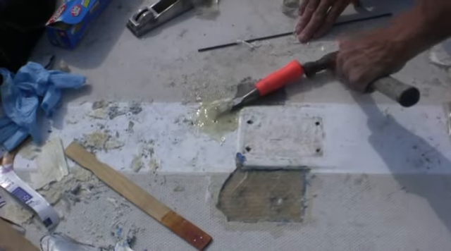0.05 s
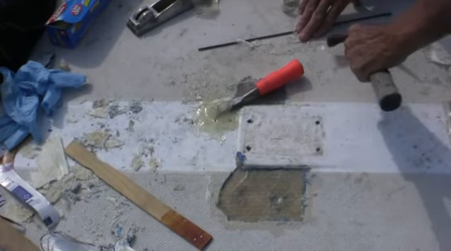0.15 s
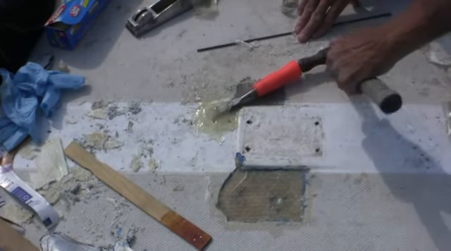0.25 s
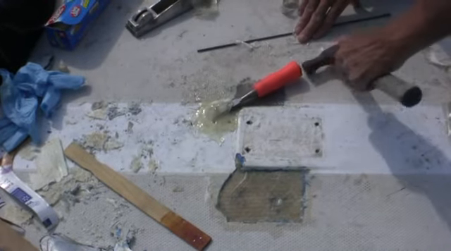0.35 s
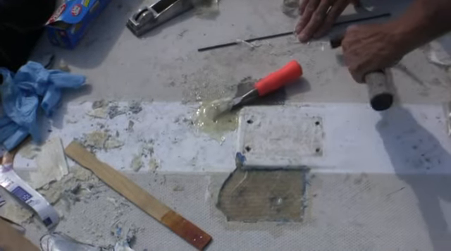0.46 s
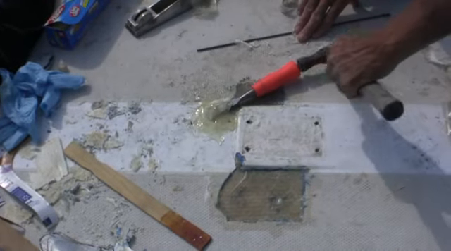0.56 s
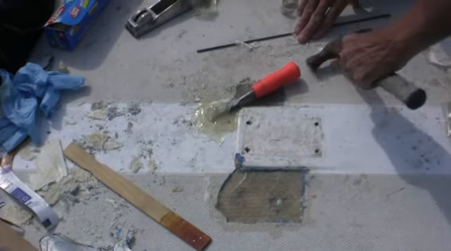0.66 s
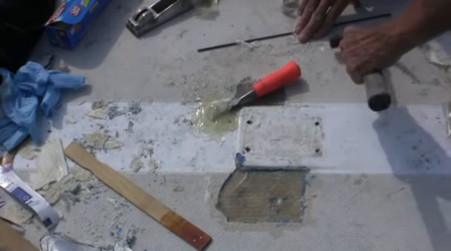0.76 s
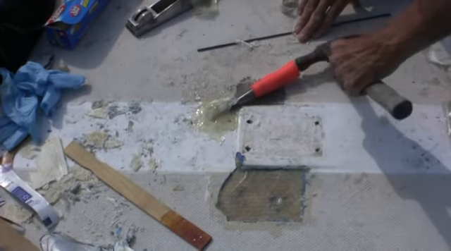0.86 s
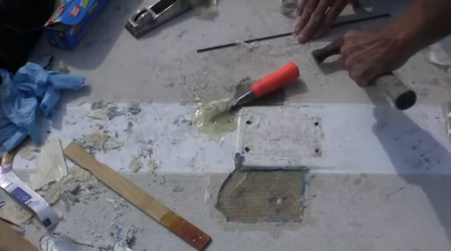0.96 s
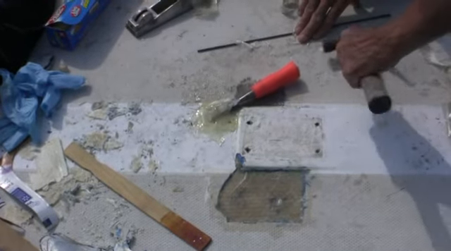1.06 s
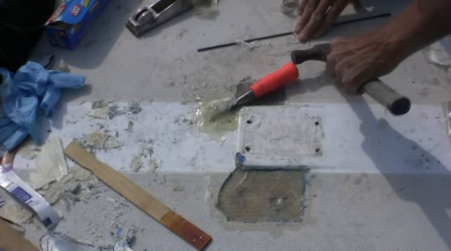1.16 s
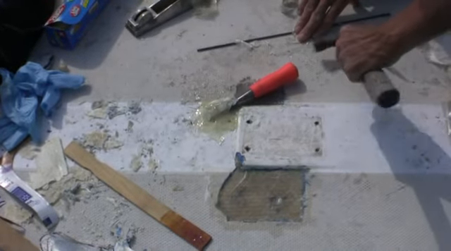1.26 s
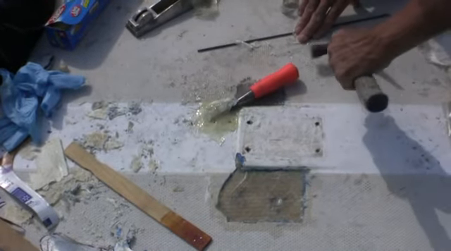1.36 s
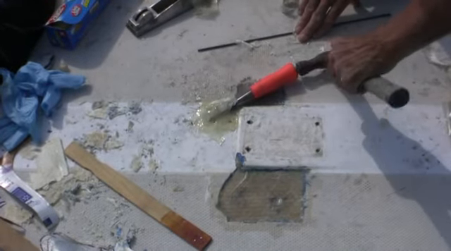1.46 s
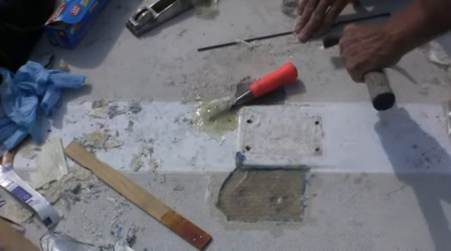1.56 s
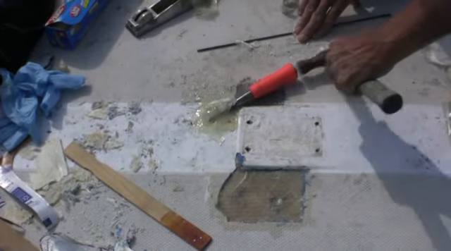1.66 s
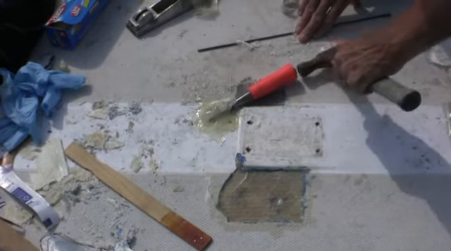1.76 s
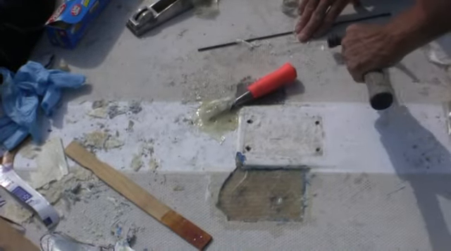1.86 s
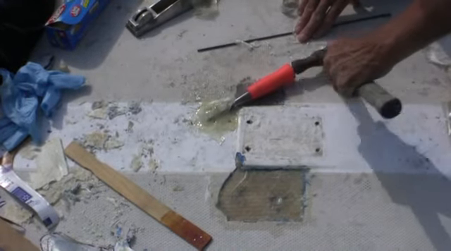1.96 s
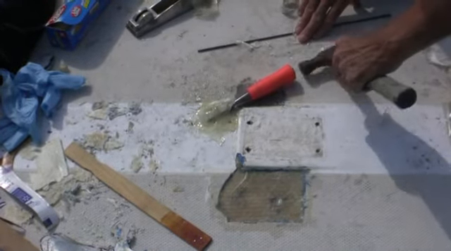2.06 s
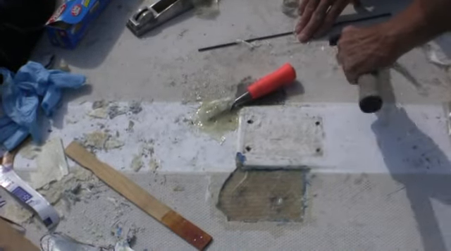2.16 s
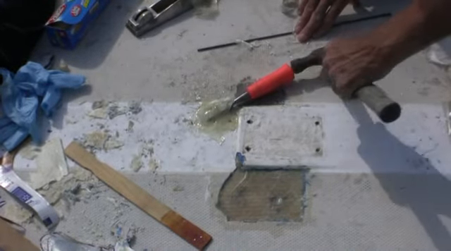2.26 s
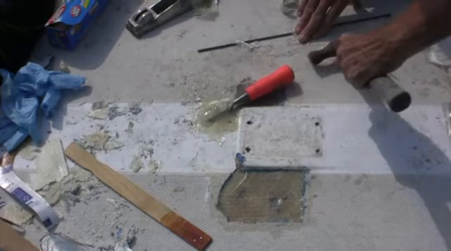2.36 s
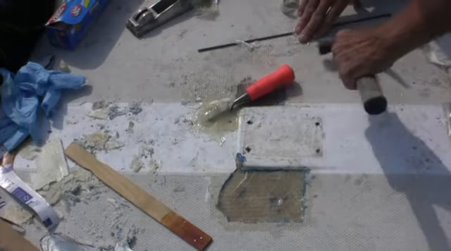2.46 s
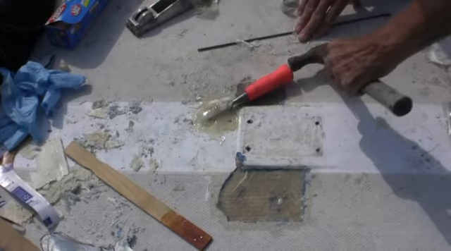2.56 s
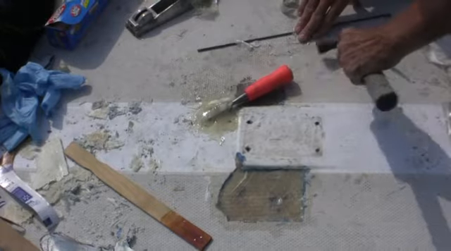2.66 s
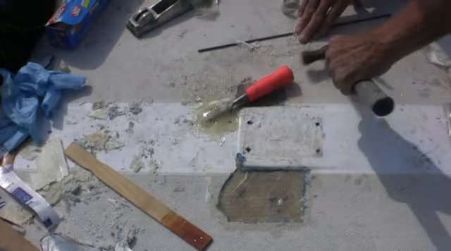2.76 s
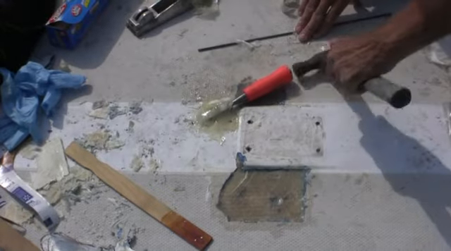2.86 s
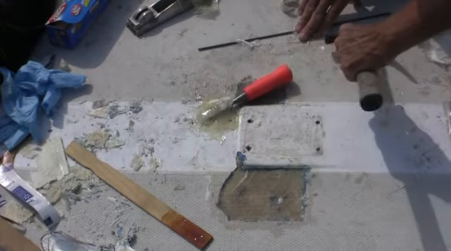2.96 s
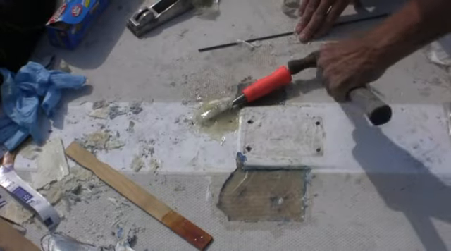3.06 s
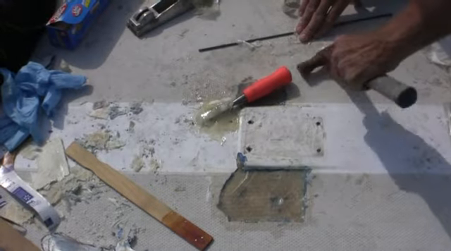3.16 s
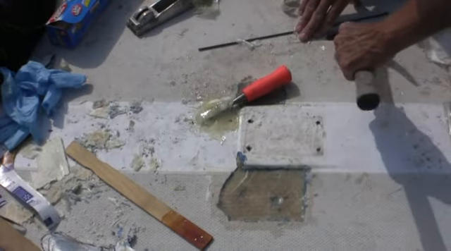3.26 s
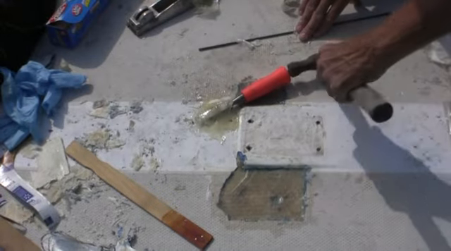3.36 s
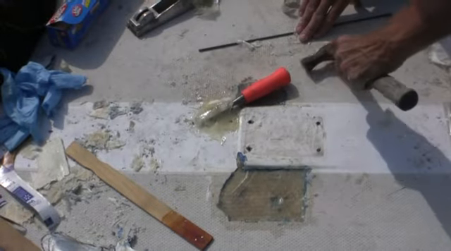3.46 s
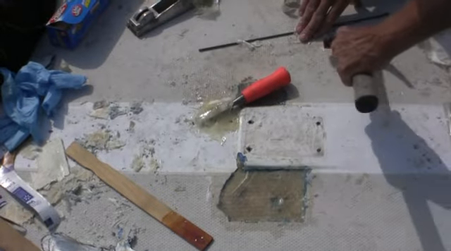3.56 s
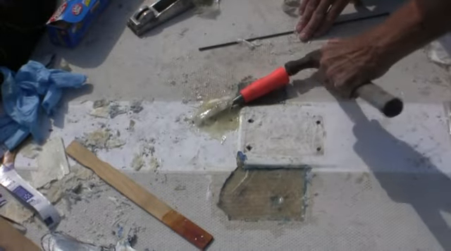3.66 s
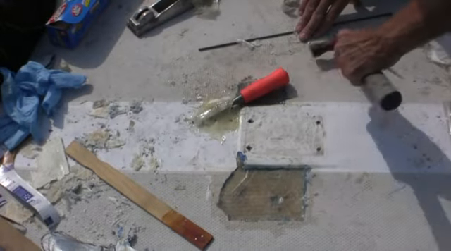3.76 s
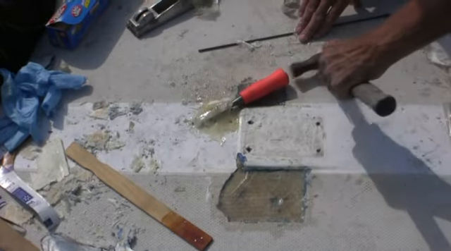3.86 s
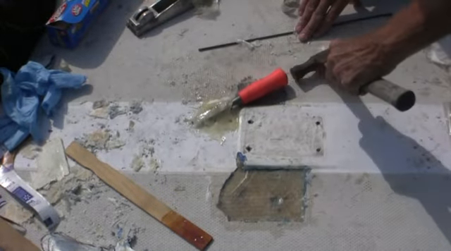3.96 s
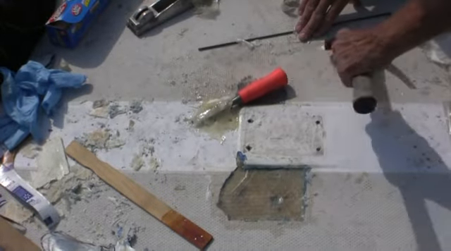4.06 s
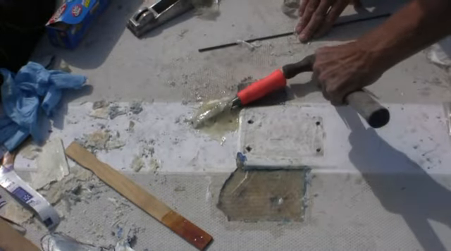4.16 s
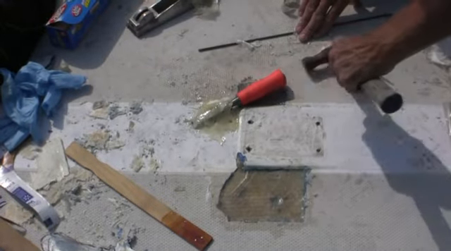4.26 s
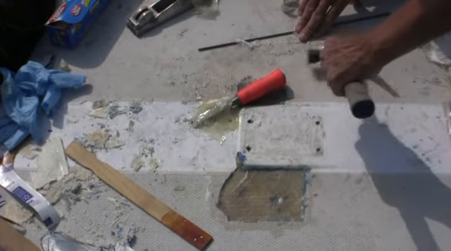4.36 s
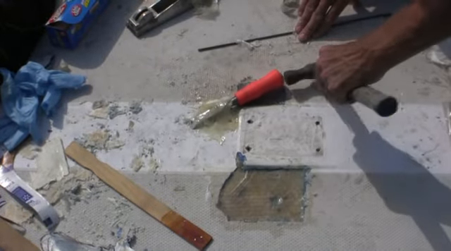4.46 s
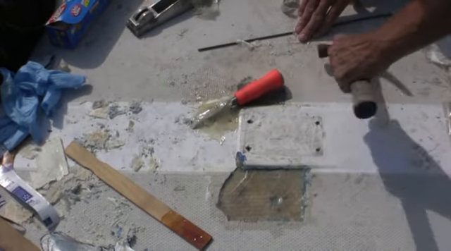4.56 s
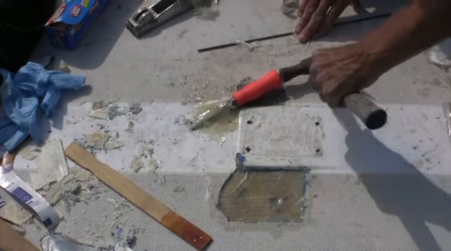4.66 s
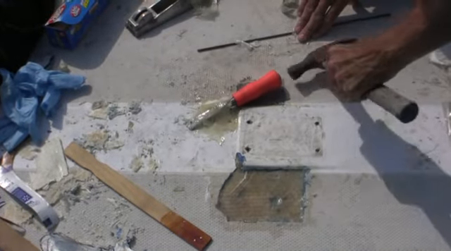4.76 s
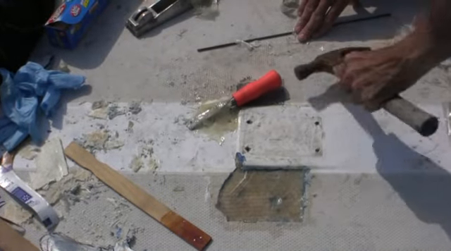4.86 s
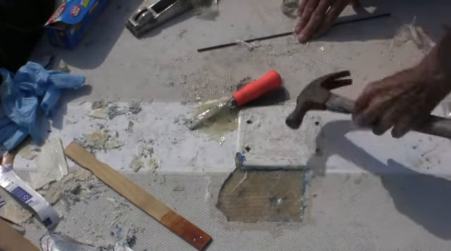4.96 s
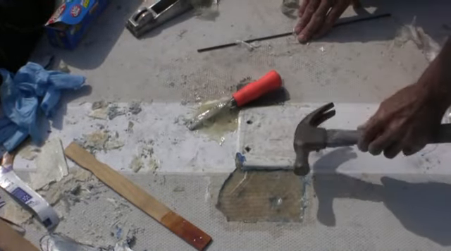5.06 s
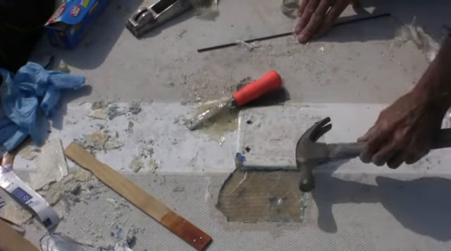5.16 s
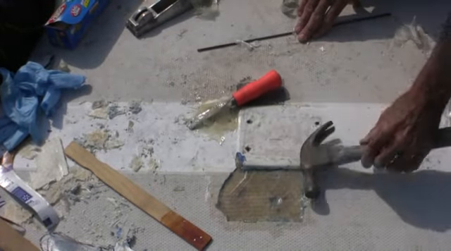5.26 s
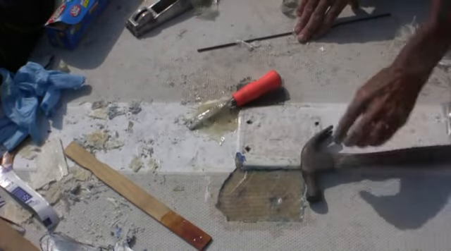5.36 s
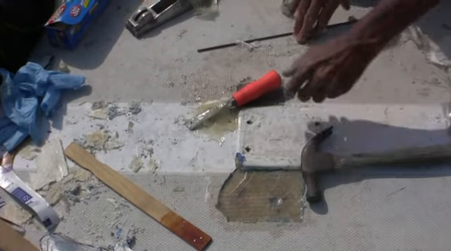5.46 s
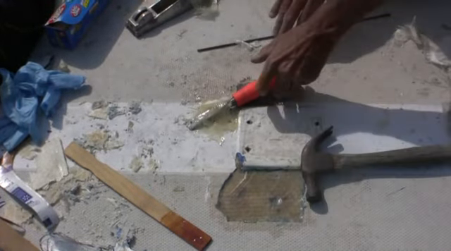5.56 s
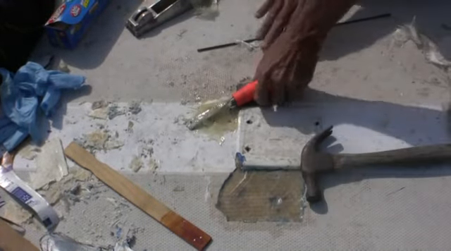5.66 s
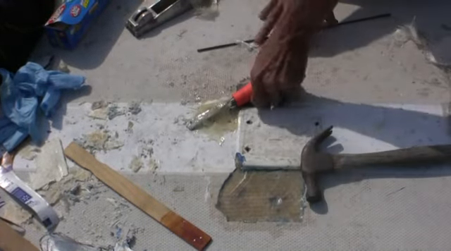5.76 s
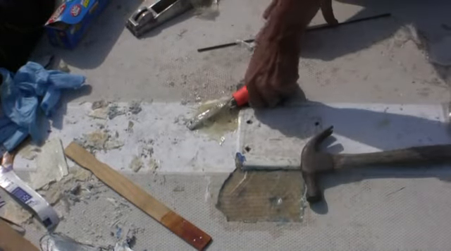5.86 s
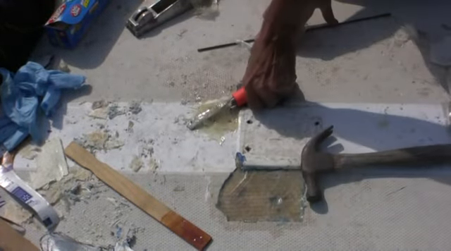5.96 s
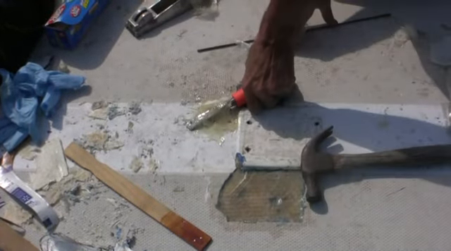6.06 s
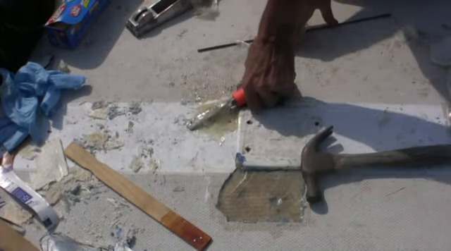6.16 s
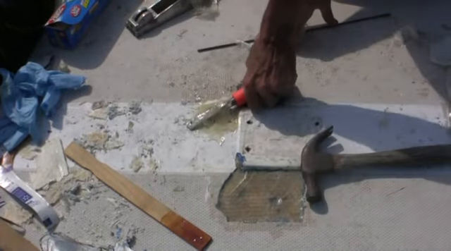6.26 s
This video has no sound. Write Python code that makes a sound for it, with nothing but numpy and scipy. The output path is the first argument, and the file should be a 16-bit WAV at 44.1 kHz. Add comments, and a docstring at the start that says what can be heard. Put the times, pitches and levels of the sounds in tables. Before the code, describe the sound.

Close outdoor stereo: a steel hammer taps a chisel's plastic handle about three and a half times a second, each blow a dry, cracking snap so loud its peak distorts, with brief hollow deck response, faint steel ring and a short slap of nearby echoes. After eighteen even taps, the hammer is dropped, thumping and clattering in quick bounces. Only tiny handling ticks and a soft hush remain.

```python
"""Sharp, evenly spaced taps, then a clatter: a steel hammer taps a chisel's plastic handle and is dropped flat.
Contact: rough noise of a few ms through the chisel's resonances; its peaks overload the input.
Hollow boat deck: damped sines; hammer: ringing steel tones; landings: low thumps; nearby things: dense noise echoes.
Under it lie small filtered-noise ticks and a quiet outdoor hush of shaped noise."""
import sys
import numpy as np
from scipy import signal
from scipy.fft import rfft, irfft
from scipy.io import wavfile
from scipy.ndimage import uniform_filter1d

SR = 44100
rng = np.random.default_rng(int(sys.argv[2]) if len(sys.argv) > 2 else 0)


def decibels_to_gain(level_db):
    """Convert a level in decibels to a linear amplitude gain (20 dB per decade)."""
    exponent = np.asarray(level_db, float) / 20
    return 10 ** exponent


def wrap_up_sound(samples):
    """Save the sound to the file named by the first command line argument, as 16-bit audio."""
    columns = np.atleast_2d(samples).T
    # keep every value between -1 and 1, then stretch to whole-number steps
    tamed = np.clip(columns, -1, 1)
    steps = np.round(tamed * 32767).astype(np.int16)
    wavfile.write(sys.argv[1], SR, steps)


N = 277830

# outdoor hush spectrum: f/Hz, relative level/dB
AIR_SPECTRUM = [(12, -32.5), (20, -0.5), (230, -16.5), (332, -15.5), (361, -11), (465, -17), (1020, -20.5),
                (1240, -23.5), (3520, -29.5), (4930, -31), (7730, -34), (13900, -48), (16500, -58)]
# slow swell of the hush: t/s, level/dB
AIR_SWELL = [(0, 0), (2.5, 1), (4.9, 0), (5.3, -2.5), (5.701, -0.5), (6.0, -2), (6.3, -2.5)]
# left-right likeness of the hush: f/Hz, correlation/1
AIR_LIKENESS = [(40, .6), (300, 0.51), (1000, 0.029), (16000, 0.045)]
# echoes from nearby boats and walls: t after the blow/s, relative level/dB
RETURN_DECAY = [(.004, 8.5), (.02, -1.5), (.06, -2), (.1, -8), (.14, -15.5), (.2, -25.5), (.3, -43.5),
                (.45, -63)]
# echo spectrum: f/Hz, relative level/dB
RETURN_COLOUR = [(60, 17), (300, 8), (900, 2.5), (1300, -1.5), (1750, 1), (2600, -3.5), (3500, -6),
                 (6500, -7.5), (8500, -14), (16000, -11)]
# ticks and bumps of hand and chisel: t/s, peak level/dB, f/Hz, t60/s
TICKS = [(5.227, -42, 2820, 0.0089), (5.725, -41, 302, .03), (5.8, -43, 180, 0.047),
         (6.079, -44, 410, 0.049), (6.188, -45.5, 199.4, 0.015), (6.214, -42.5, 180, 0.074),
         (6.249, -37, 770, 0.02), (6.249, -53, 1630, 0.0067), (6.279, -38, 170, 0.033),
         (6.283, -55, 895, 0.052)]
# hammer landing and bouncing: t/s, thud level/dB, knock level/dB, crack level/dB, thump level/dB, thump f/Hz
DROPS = [(5.3417, -32, -18.5, -20, -1.5, 208), (5.3725, -20, -22, -19, -3, 382),
         (5.4123, -18, -13, -14.5, -8.5, 302), (5.4385, -18.5, -24, -25, -18, 320),
         (5.4456, -19, -17.5, -21, -27, 300)]
# hollow deck, each row a knot of close modes: centre f/Hz, relative level/dB, t60/s
DECK_MODES = [(48, -4.5, 0.65), (66, -6.5, 0.17), (88.6, -6, 0.25), (124.05, -12.5, 0.92),
              (143.1, -4, 0.29), (180, -5.5, 0.34), (217.4, -8, 0.34), (258.2, -7, 0.2), (358, -4.5, 0.14),
              (447, -5, 0.14), (588, -18.5, 0.16), (692, 0.5, 0.096), (854.3, 7.5, 0.041),
              (899.6, -16, 0.13), (1100, -8.5, 0.048)]
# hammer steel: f/Hz, part (0 shank, 1 claw, 2 head), relative level/dB, t60 held/s, t60 loose/s, grip loss/dB
STEEL_TONES = [(4511, 0, 5, .1, .26, 0), (4624, 0, -6, .08, .65, 0), (7368, 0, 0, .05, .14, 25),
               (7962, 0, -6, .05, .14, 22), (13420, 1, 10, .15, .17, 0), (14145, 1, 8, .18, .2, 0),
               (5657, 2, 6, 1.3, 1.5, 0)]
# bounces that ring the loose steel: t/s, shank level/dB, claw level/dB, head level/dB
LOOSE_RINGS = [(5.4129, -26, -52, -70), (5.4454, -25, -50, -48)]
# taps; landing spot sets deck and steel answer: t/s, thud level/dB, shank level/dB, claw level/dB, head level/dB
TAPS = [(0.0579, -16, -29.5, -46, -43.5), (0.3363, -20, -29, -60.5, -51.5),
        (0.6196, -14.5, -51.5, -60, -44), (0.9003, -15, -26.5, -46, -50.5), (1.182, -15, -36.5, -50, -52),
        (1.465, -18, -51.5, -45, -46), (1.7479, -18, -47, -48, -62), (2.0379, -16, -27.5, -61.5, -50),
        (2.3114, -16, -36, -56, -56), (2.5818, -16, -47, -56.5, -55.5), (2.8595, -17.5, -53.5, -46, -54.5),
        (3.1287, -16.5, -28.5, -44, -44), (3.4085, -17.5, -29, -61, -52.5),
        (3.6941, -20.5, -25.5, -50.5, -53.5), (3.9532, -16, -28, -46.5, -58.5),
        (4.2145, -19, -33.5, -65.5, -50.5), (4.4738, -16.5, -23.5, -57, -37),
        (4.7231, -16, -33, -55.5, -72)]
# contact bands thud, knock, crack, snap: low f/Hz, high f/Hz
BANDS_HZ = [(300, 1200), (1200, 3000), (3000, 7000), (7000, 17000)]
# drive time of each contact band: t/s
CONTACT_S = [0.0022, 0.0051, 0.0028, 0.00067]
# left minus right in each contact band: level/dB
BAND_LEFT_DB = [-4, -3, -2, 2]
# short resonances of chisel and handle: f/Hz, width/Hz, relative level/dB
CHISEL = [(790, 300, -16.5), (1756, 910, -0.5), (3457, 1200, -1.5), (5700, 73, -31), (7900, 140, -39),
          (9600, 190, -57.5), (12600, 2000, -24), (12830, 1900, 7), (16600, 430, -17.5)]
# lead of the left port over the right: f/Hz, phase/rad
PORT_PHASE = [(1000, 0), (4000, -.4), (6300, -.3), (7750, -1.2), (9400, .2), (11600, .8), (15000, -.7)]

AIR_DB = -50
HISS_HZ, HISS_WIDTH_HZ, HISS_DB = 7740, 150, 9  # faint narrow hiss in the hush
RETURN_DB, LEFT_DB = -10, -4  # LEFT_DB: left minus right for deck, steel, ticks and echoes
THUMP_T60_S, THUMP_FLOOR_HZ = 0.014, 110  # floor: lowest frequency kept in the thumps
DECK_THUD_DB = -11  # share of the thud entering the deck
DECK_SPREAD_DB = 3  # random level spread of the deck modes, drawn anew per blow
DECK_RISE_CYCLES = 1.1
STILL_SINGING_DB = -47  # head tone left from an earlier tap
SWING_HZ, ROCK_S = 11, .205  # shake in the hand; first rock once let go
WAVER_HELD, WAVER_LOOSE = .2, .9  # depth, 0-1
TAP_SPREAD_DB = 0.1  # much the same swing every time
KNOCK_DB, KNOCK_DB_PER_S = -25, 1.12  # the chisel wedges tighter: more knock,
CRACK_DB, CRACK_DB_PER_S = -8, 0.22  # more crack
BOOM_DB, BOOM_DB_PER_S = -35, -1  # and less boom
SNAP_DB = -16.5
DROP_SNAP_DB, DROP_BOOM_DB = -51, -46  # snap relative to crack, boom relative to thump
LOW_CUT_HZ, EDGE_HZ = 80, 15900


def read(points, hz):
    """Looks up a spectrum on a log frequency axis."""
    f, value = np.transpose(points)
    return np.interp(np.log(hz + 1), np.log(f + 1), value)


def add(mix, s, sound):
    """Mixes a sound in at time s."""
    part = mix[..., round(s * SR):][..., :sound.shape[-1]]
    part += sound[..., :part.shape[-1]]


def resonate(x, hz, width_hz):
    """Two-pole resonance with gain near 1 at its peak."""
    r = np.exp(-np.pi * width_hz / SR)
    return signal.lfilter([1 - r, 0, r - 1], [1, -2 * r * np.cos(2 * np.pi * hz / SR), r * r], x)


def air():
    """Quiet outdoor hush: shaped noise with drifting patches, partly alike left and right."""
    frames, hz = N // 256 + 5, np.fft.rfftfreq(1024, 1 / SR)
    a, b, c, d, patches = rng.standard_normal((frames, 513, 5)).T
    patches = uniform_filter1d(uniform_filter1d(patches, size=10, axis=0), size=12, axis=1)
    patches_db = 0.5 * patches / patches.std()
    same = np.clip(read(AIR_LIKENESS, hz), -1, 1)[:, None]
    left = a + 1j * b
    right = same * left + np.sqrt(1 - same ** 2) * (c + 1j * d)
    hiss_db = HISS_DB * np.exp(-((hz - HISS_HZ) / HISS_WIDTH_HZ) ** 2)
    colour_db = (read(AIR_SPECTRUM, hz) + hiss_db)[:, None] + patches_db
    z = np.array([left, right]) * decibels_to_gain(colour_db)
    hush = signal.istft(z, nperseg=1024, noverlap=768)[1][:, :N]
    swell_db = np.interp(np.arange(N) / SR, *np.transpose(AIR_SWELL))
    return decibels_to_gain(AIR_DB + swell_db) * hush / hush.mean(0).std() * decibels_to_gain([[-1.1], [1.1]])


def surroundings(x):
    """Dense reflections, partly shared by both ports, hold for under a tenth of a second and then die fast."""
    t = np.arange(SR // 2) / SR
    common, left, right = rng.standard_normal((3, len(t)))
    echoes = .87 * common + .5 * np.array([left, right])
    echoes = echoes * decibels_to_gain(np.interp(t, *np.transpose(RETURN_DECAY), left=-90))
    dull = signal.sosfilt(signal.butter(2, 7500, fs=SR, output="sos"), echoes)
    echoes = dull + (echoes - dull) * 0.58 * np.exp(-t / .14)  # the top fades first
    colour = decibels_to_gain(read(RETURN_COLOUR, np.fft.rfftfreq(len(t), 1 / SR)))
    echoes = irfft(rfft(echoes) * colour, len(t))
    return signal.fftconvolve(x[None], echoes / np.linalg.norm(echoes[0]), axes=1)[:, :N]


def ticks():
    """Short damped knocks: decaying noise through a broad resonance."""
    out, t = np.zeros(N), np.arange(4096) / SR
    for s, db, hz, t60 in TICKS:
        rough = rng.standard_normal(len(t)) * decibels_to_gain(-60 * t / t60)
        knock = resonate(rough, hz, .5 * hz)
        add(out, s, decibels_to_gain(db) * knock / abs(knock).max())
    return out


def thumps():
    """The deck gives way under the landing weight and swings back: a heavily damped sine."""
    out, t = np.zeros(N), np.arange(4096) / SR
    for s, *_, db, hz in DROPS:
        add(out, s, -decibels_to_gain(db - 60 * t / THUMP_T60_S) * np.sin(2 * np.pi * hz * t))
    return signal.sosfilt(signal.butter(2, THUMP_FLOOR_HZ, "high", fs=SR, output="sos"), out)


def deck(thud_db, boom_db):
    """The hollow deck rings; the blow's weight feeds the lowest modes, its thud the upper ones."""
    t = np.arange(SR // 2) / SR
    hz, db, t60 = np.transpose(np.tile(DECK_MODES, (6, 1)))[..., None]  # six modes per knot
    spread, shift, phase = rng.standard_normal((3, len(hz), 1))
    fed_db = np.where(hz < 230, boom_db, thud_db + DECK_THUD_DB)
    hz = hz * (1 + .07 * shift)
    rise = 1 - np.exp(-t * hz / DECK_RISE_CYCLES)
    level_db = db + fed_db + DECK_SPREAD_DB * spread - 60 * t / t60
    return (rise * decibels_to_gain(level_db) * np.sin(2 * np.pi * (hz * t + phase))).sum(0)


def steel():
    """Each tap or listed loose bounce stops the old ring of the hammer and starts a new one."""
    out = np.zeros(N)
    rings = [(0.00097, -np.inf, -np.inf, STILL_SINGING_DB, False)]
    rings += [(s, *parts_db, False) for s, _, *parts_db in TAPS]
    rings += [(*row, True) for row in LOOSE_RINGS]
    ends = [row[0] for row in rings[1:]] + [N / SR]
    for (s, *parts_db, free), end, start in zip(rings, ends, rng.random(len(rings))):
        t = np.arange(round((end - s) * SR)) / SR
        # the turning head's tone swells and dips; let go, it rocks ever faster and settles
        turns = (t / ROCK_S) ** 2 if free else SWING_HZ * t + start
        depth = WAVER_LOOSE if free else WAVER_HELD
        dip = depth * np.exp(-(t / .3) ** 4 + 2j * np.pi * turns)
        for hz, part, db, held_s, loose_s, grip_db in STEEL_TONES:
            t60, loss_db = (loose_s, 0) if free else (held_s, grip_db)
            level_db = parts_db[round(part)] + db - loss_db - 60 * t / t60
            tone = (1 - dip * (round(part) == 2)) * np.exp(2j * np.pi * hz * t)
            add(out, s, np.sqrt(2) * decibels_to_gain(level_db) * tone.imag)
    return out


def blow(*levels_db):
    """A rough contact of a few ms rings the chisel: two port signals and the smoother wave sent all round."""
    t = np.arange(2048) / SR
    rough = rng.standard_normal((3, len(t)))
    rough[1] = 0.83 * rough[0] + 0.34 * rough[1]  # the ports hear nearly the same wave
    rough[2] = .045 * rough[0] + (np.arange(len(t)) == round(SR / 2000))  # one pulse at 0.5 ms
    detune = 1 + .06 * rng.standard_normal(len(CHISEL))  # grip and bite differ each time
    onset = 1 - np.exp(-t / 0.000067)
    out = np.zeros_like(rough)
    for k, (band, db, tau, left_db) in enumerate(zip(BANDS_HZ, levels_db, CONTACT_S, BAND_LEFT_DB)):
        drive = rough * onset * (np.exp(-(t / tau) ** 1.6) + 0.2 * np.exp(-t / 0.00083))
        rung = 0.38 * drive
        for (hz, width_hz, mode_db), d in zip(CHISEL, detune):
            rung = rung + decibels_to_gain(mode_db) * resonate(drive, hz * d, width_hz)
        part = signal.sosfilt(signal.butter(2, band, "band", fs=SR, output="sos"), rung)
        part /= np.sqrt(np.mean(part[:, :SR // 160] ** 2, axis=1, keepdims=True))  # unit rms at the start
        gain = decibels_to_gain(db + np.array([[left_db / 2], [-left_db / 2], [0]]))
        out += gain * part * (-1) ** k  # neighbours join in phase
    return out


def contacts():
    """Every tap and bounce as (t/s, then thud, knock, crack, snap, boom level/dB)."""
    chances_db = TAP_SPREAD_DB * rng.standard_normal((len(TAPS), 4))
    hits = []
    for (s, thud_db, *_), chance_db in zip(TAPS, chances_db):
        knock_db = KNOCK_DB + KNOCK_DB_PER_S * s
        crack_db = CRACK_DB + CRACK_DB_PER_S * s
        boom_db = BOOM_DB + BOOM_DB_PER_S * s
        hits.append((s, thud_db, *(chance_db + [knock_db, crack_db, SNAP_DB, boom_db])))
    for s, thud_db, knock_db, crack_db, thump_db, _ in DROPS:
        hits.append((s, thud_db, knock_db, crack_db, crack_db + DROP_SNAP_DB, thump_db + DROP_BOOM_DB))
    return hits


def scene():
    """Blows, deck, steel and ticks over the hush, right of centre except the blows' top band, which leans left."""
    hits, sent = np.zeros((2, N)), np.zeros((3, N))
    boom = ticks() + thumps()
    for k, (s, *levels_db, boom_db) in enumerate(contacts()):
        wave = blow(*levels_db)
        add(hits, s, wave[:2])
        add(sent[k % 3], s, wave[2])
        add(boom, s, deck(levels_db[0], boom_db))
    ring = steel()
    sent[0] += .5 * ring + .5 * boom
    # three fixed echo patterns, used in turn by successive blows
    back = decibels_to_gain(RETURN_DB) * sum(surroundings(x) for x in sent)
    return hits + (boom + ring + back) * decibels_to_gain([[LEFT_DB / 2], [-LEFT_DB / 2]]) + air()


def roll_off(x):
    """The treble ends steeply here."""
    return signal.sosfilt(signal.butter(12, 16790, fs=SR, output="sos"), x)


def record(dry):
    """The microphone drops the deepest bass, the input stage flattens the peaks, then the band is limited."""
    heard = signal.sosfilt(signal.butter(2, LOW_CUT_HZ, "high", fs=SR, output="sos"), dry)
    # the two ports sit a little apart
    turn = np.exp(.5j * read(PORT_PHASE, np.fft.rfftfreq(N, 1 / SR)) * [[1], [-1]])
    heard = irfft(rfft(heard) * turn, N)
    flat = np.clip(heard, -.97, .97)
    limited = signal.oaconvolve(flat, signal.firwin(101, EDGE_HZ, fs=SR)[None], "same")
    return roll_off(limited)


dry = scene()
out = record(dry)
wrap_up_sound(out)
```